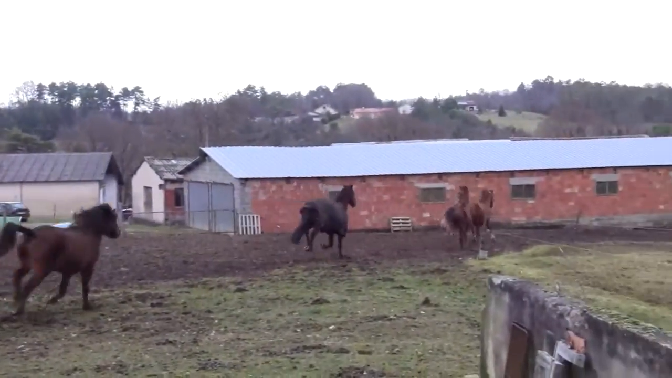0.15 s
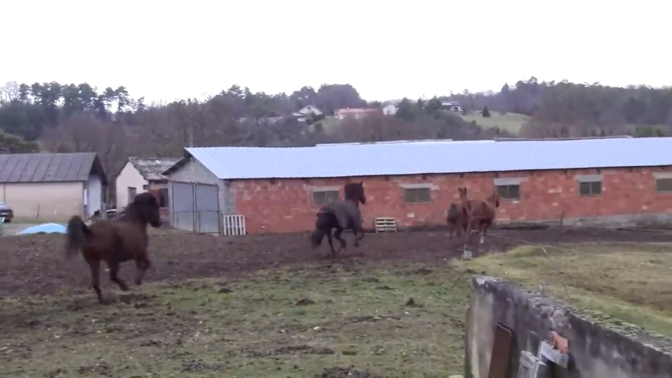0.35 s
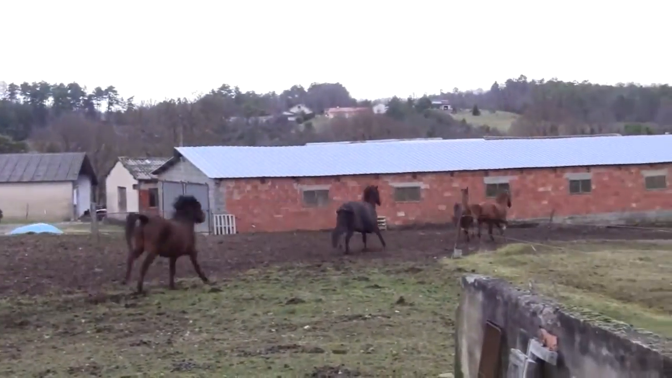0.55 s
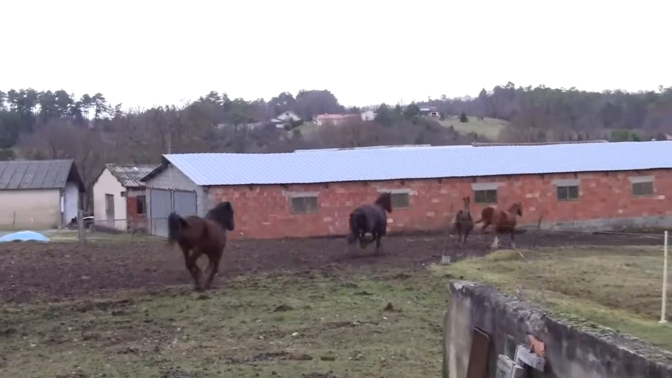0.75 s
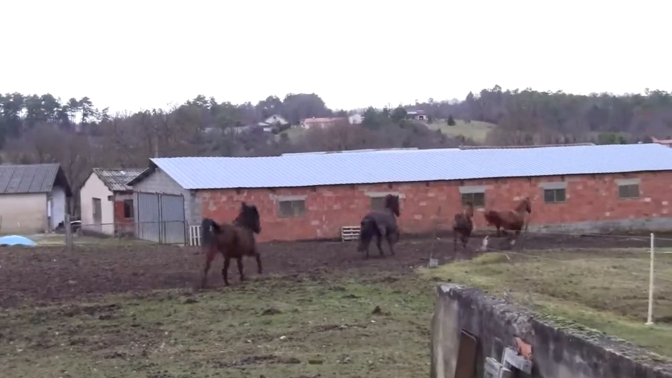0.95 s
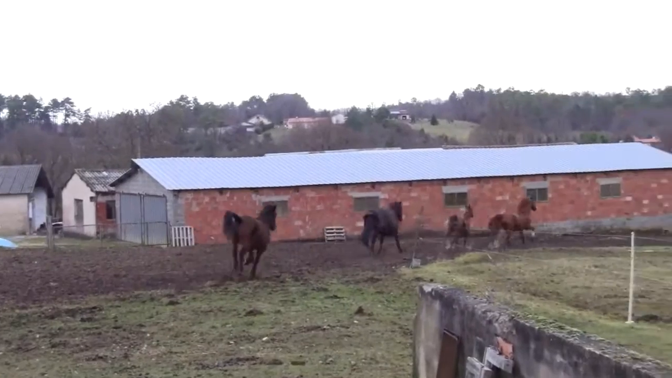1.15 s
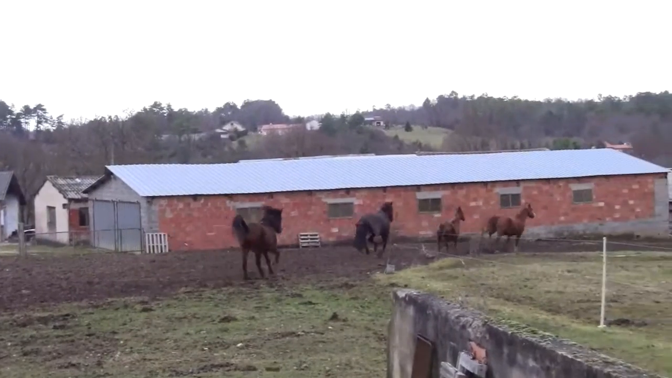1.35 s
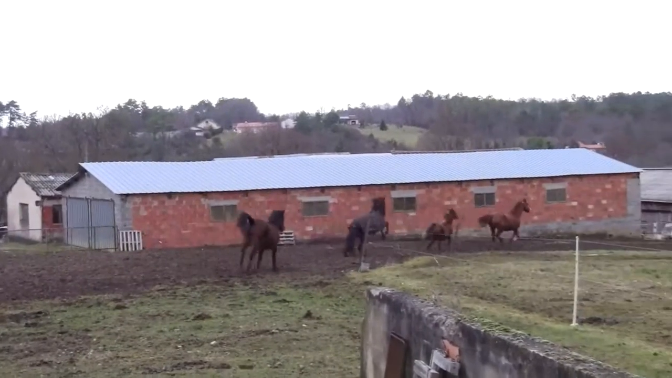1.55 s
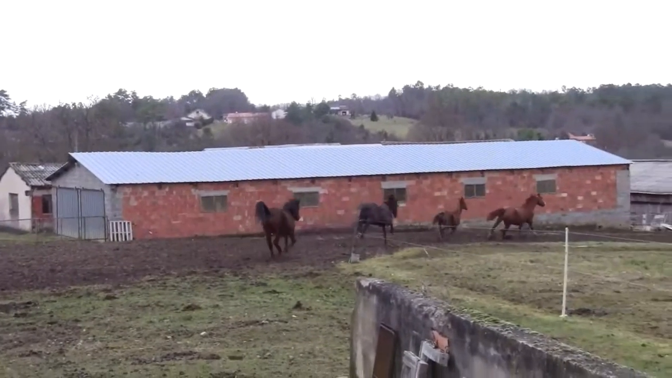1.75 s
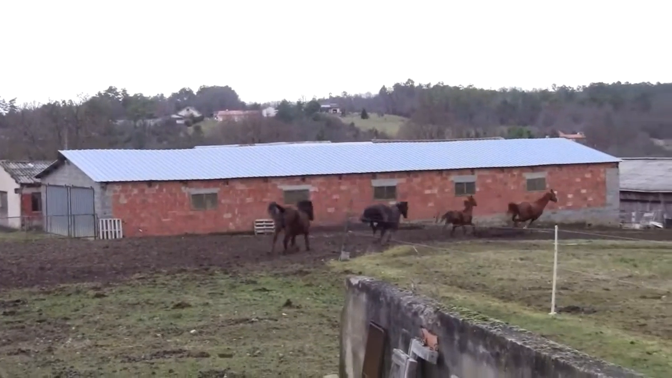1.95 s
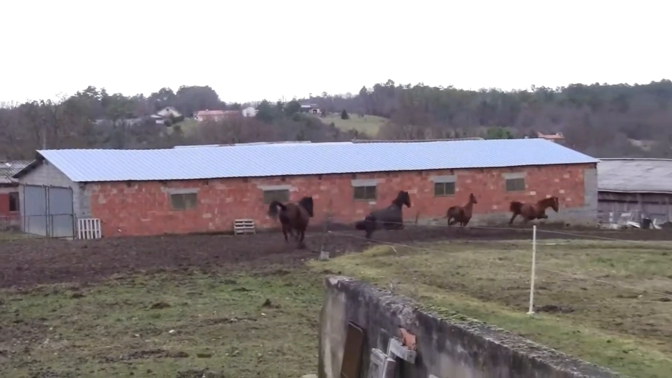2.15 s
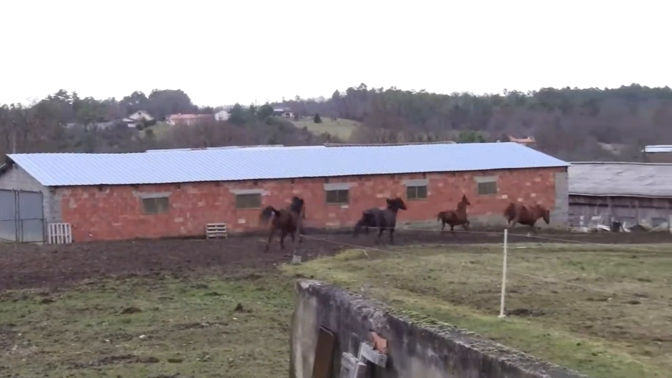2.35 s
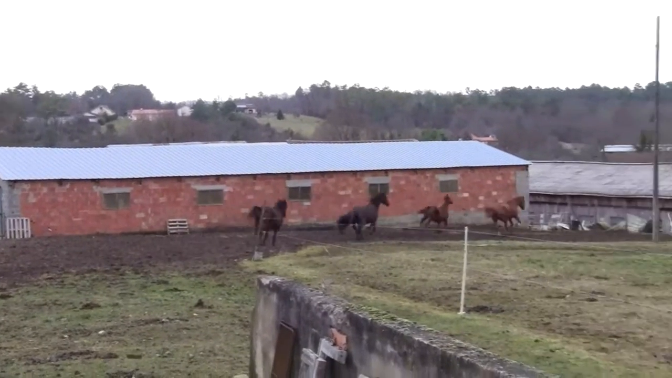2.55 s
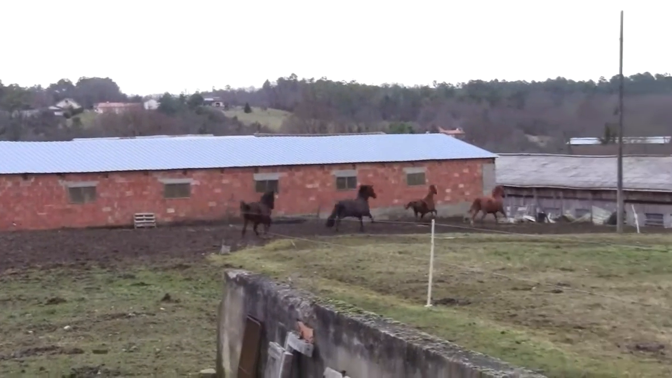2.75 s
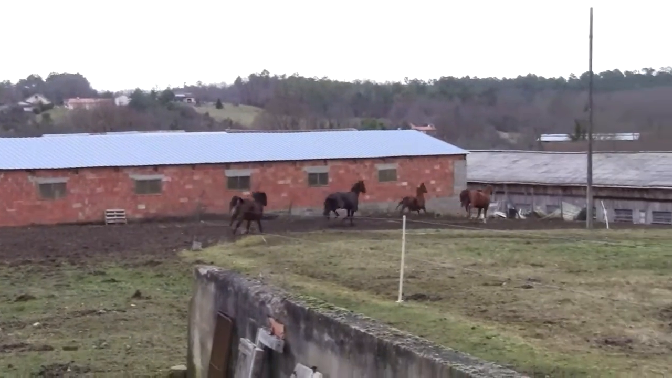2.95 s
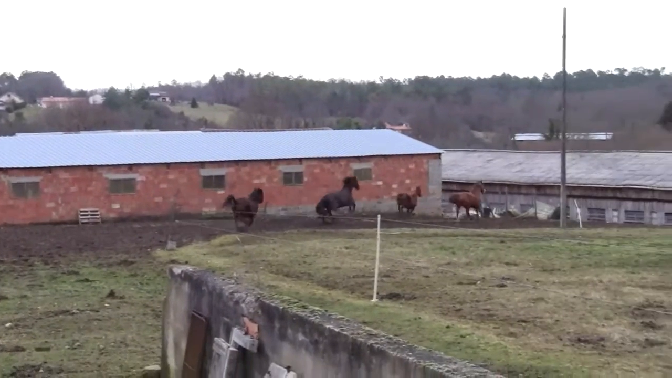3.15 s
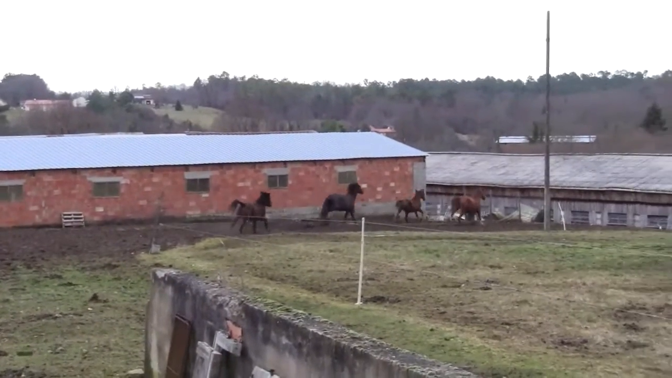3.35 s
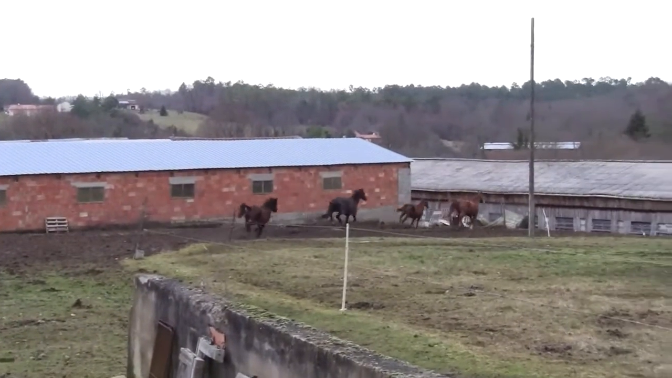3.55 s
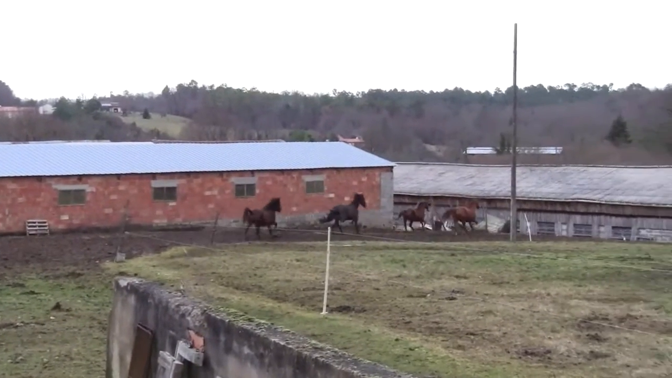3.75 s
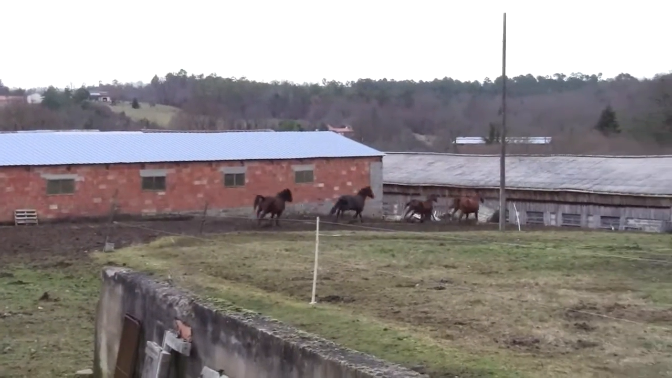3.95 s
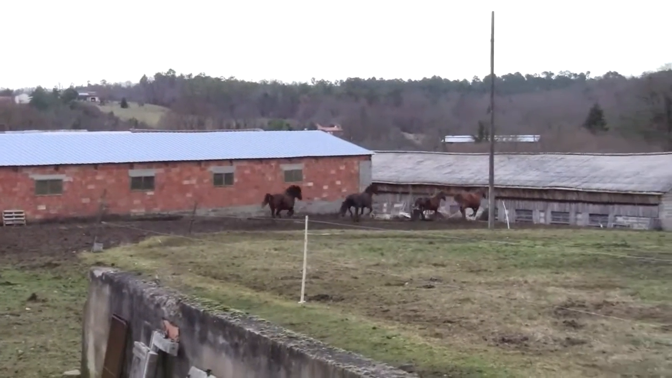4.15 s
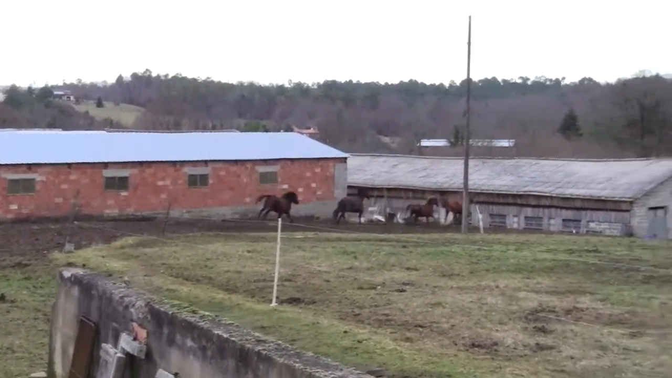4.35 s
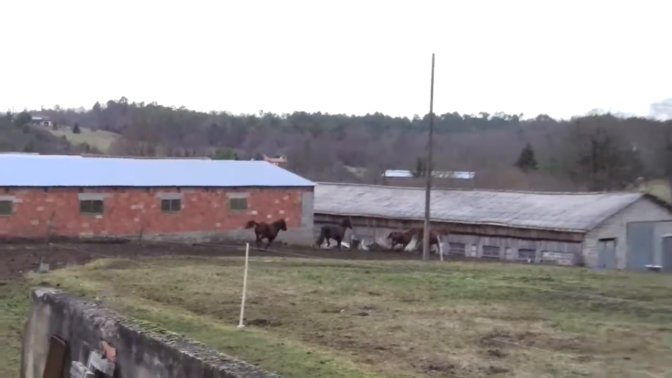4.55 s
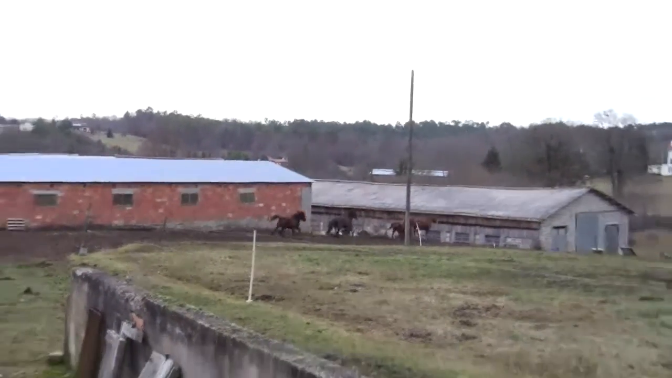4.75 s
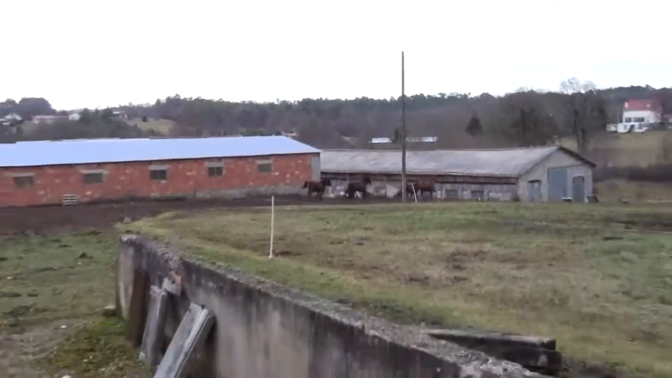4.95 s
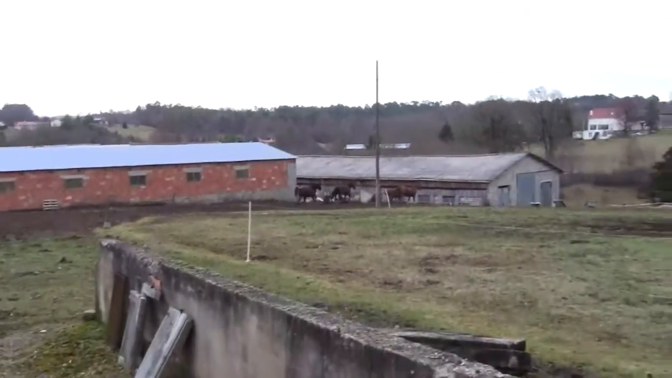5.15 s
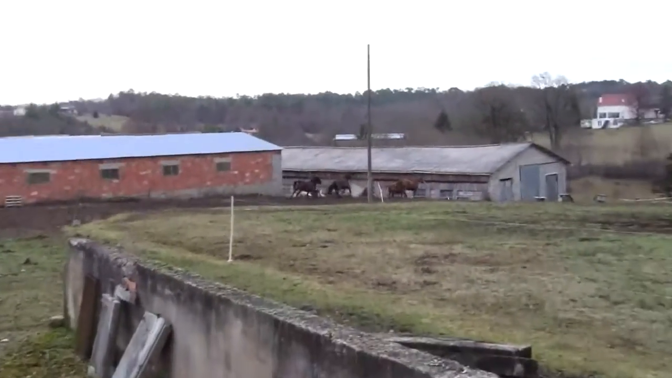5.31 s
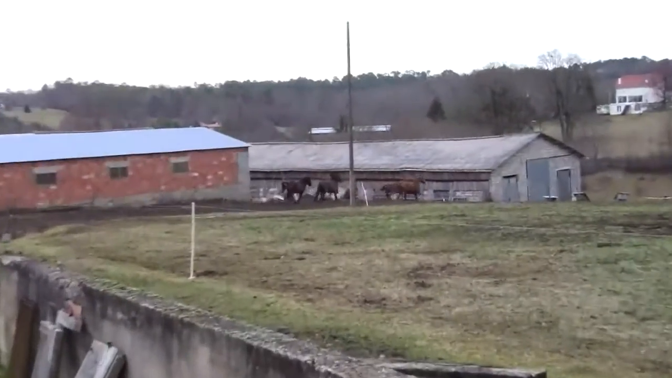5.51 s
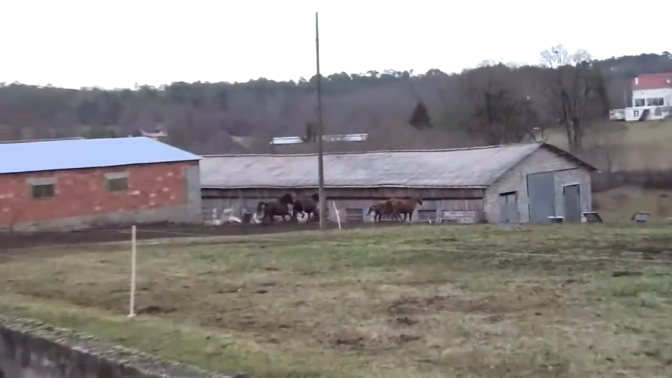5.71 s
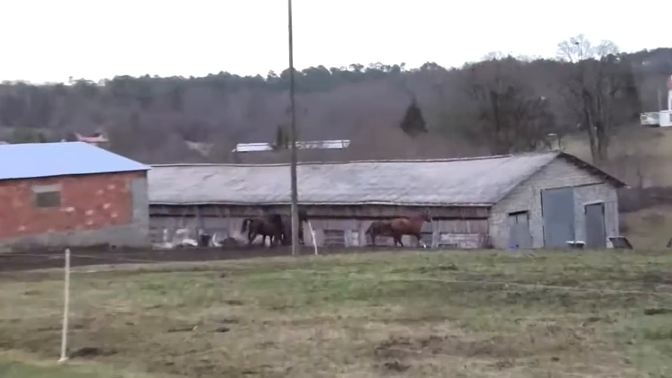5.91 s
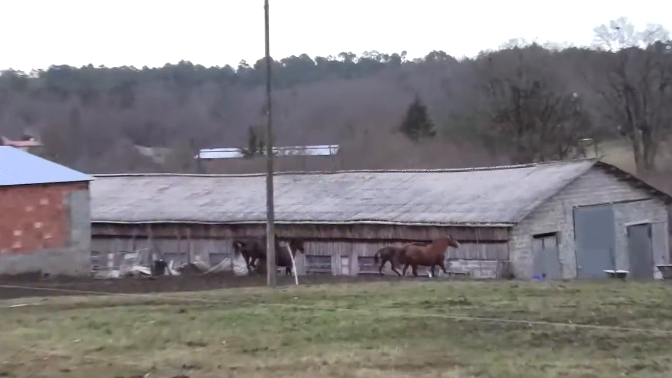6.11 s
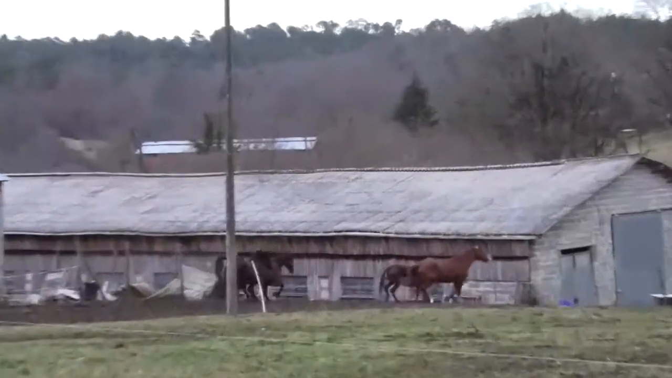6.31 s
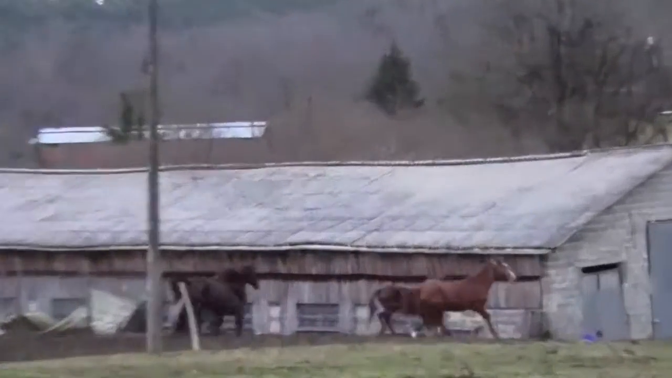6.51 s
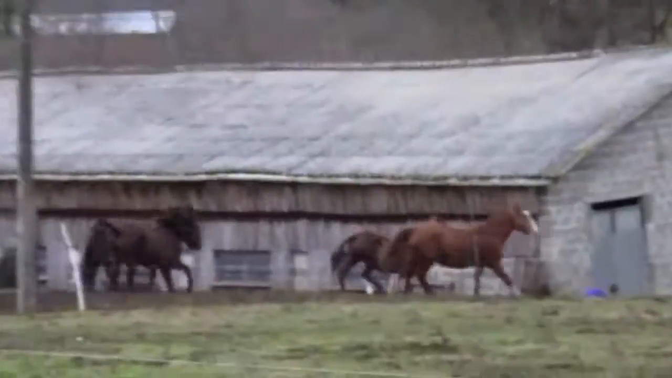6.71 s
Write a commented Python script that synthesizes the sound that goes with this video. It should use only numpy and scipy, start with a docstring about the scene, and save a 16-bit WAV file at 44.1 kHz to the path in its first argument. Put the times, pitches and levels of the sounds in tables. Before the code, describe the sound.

Outdoors beside a long barn, a few horses gallop off across mud and wet grass. Close, heavy, dull thuds and sharp mud splats come first, then an irregular overlapping patter recedes, with some hooves clipping stones. Faint sparrows chirp, a horse snorts softly far off, and fingers knock the hand-held camera around five seconds. The hoofbeats sink into a low hush, ending with slight wind rumble.

```python
"""Wet grass and mud beside a long barn: horses gallop away, heard from a hand-held camera.
Each hoof drives a dull one-or-two-cycle thud from the ground and splats noisy mud; many fainter beats
blur into a patter over filtered-noise hush. Hooves clip stones, one horse snorts, the barn echoes.
Fingers ring the camera shell's modes, its lens motor ticks, far sparrows whistle gliding tones;
a soft treble hiss swells and sinks, and a puff of wind rumbles at the end."""
import sys
import numpy as np
from scipy import signal
from scipy.fft import rfft, irfft, next_fast_len
from scipy.io import wavfile
from scipy.ndimage import uniform_filter1d

SR = 44100
rng = np.random.default_rng(int(sys.argv[2]) if len(sys.argv) > 2 else 0)


def decibels_to_gain(level_db):
    """Convert a level in decibels to a linear amplitude gain (20 dB per decade)."""
    exponent = np.asarray(level_db, float) / 20
    return 10 ** exponent


def pcm_store(signal):
    """Save signal as 16-bit PCM."""
    levels = np.round(np.clip(np.atleast_2d(signal), -1, 1) * 32767)
    wavfile.write(sys.argv[1], SR, levels.astype(np.int16).T)


N = 298539  # length in samples


def evened(x):
    """Normalisation of signal power: scales to rms 1."""
    return x / np.sqrt(np.mean(x ** 2) + 1e-20)


def read(points, hz):
    """Logarithmic frequency scale: interpolates a curve linearly along it."""
    f, value = np.transpose(points)
    return np.interp(np.log(hz + 1), np.log(f + 1), value)


def add(mix, s, sound):
    """Linear superposition: adds a sound to the mix in place, from s seconds."""
    at = round(s * SR)
    part = mix[..., max(at, 0):][..., :sound.shape[-1] + min(at, 0)]
    part += sound[..., max(-at, 0):][..., :part.shape[-1]]


def coloured(x, points):
    """Zero-phase filtering: multiplies the spectrum by a gain curve of (f/Hz, level/dB)."""
    size = next_fast_len(x.shape[-1])
    gain = decibels_to_gain(read(points, np.fft.rfftfreq(size, 1 / SR)))
    return irfft(rfft(x, size) * gain, size)[..., :x.shape[-1]]


def air(points, patchy_db):
    """Partial coherence: two-channel noise, less alike at high frequency, with drifting patches."""
    # likeness of the two noises: f/Hz, coherence/1
    likeness = [(60, 1), (340, 0.95), (1970, 0.59), (11300, 0.38)]
    frames, hz = N // 128 + 5, np.fft.rfftfreq(512, 1 / SR)
    a, b, c, d, patches = rng.standard_normal((frames, 257, 5)).T
    patches = uniform_filter1d(patches, size=8, axis=0)
    patches = evened(uniform_filter1d(patches, size=12, axis=1))
    same = np.clip(read(likeness, hz), -1, 1)[:, None]
    left = a + 1j * b
    right = same * left + np.sqrt(1 - same ** 2) * (c + 1j * d)
    z = np.array([left, right]) * decibels_to_gain(patchy_db * patches)
    noise = signal.istft(z, nperseg=512, noverlap=384)[1][:, :N]
    return evened(coloured(noise, points))


def thud(hz, ms, luck, rings=0.54):
    """Damped elastic rebound: pushed ground swings back, rarefaction first, sagging in pitch."""
    u = np.arange(-1.5, 5, 1000 / (ms * SR))  # time in contact lengths, 0 at the peak
    shape = np.where(u < 0, np.exp(-(u / 0.58) ** 2), np.exp(-(abs(u) / rings) ** 1.44))
    turns = hz * ms / 1000 * (u - 0.029 * u * abs(u))
    return -1.5 * ms / 1000, shape * np.sin(2 * np.pi * turns + 0.44 * luck)


def patter():
    """Incoherent summation: random small hoofbeats and droplets blur over rumble and rustle."""
    # spectrum of the low rumble: f/Hz, relative level/dB
    rumble = [(15, -58), (25, -22), (102, -4.5), (261, 3), (730, -9.5), (1180, -13), (1500, -17.5),
              (1950, -22), (3300, -120)]
    # spectrum of the rustle: f/Hz, relative level/dB
    rustle = [(410, 0.5), (700, -16.5), (1160, -3), (1500, -7.5), (2310, -4), (2720, -11.5), (3060, -7),
              (4200, -8), (6710, -16), (9310, -12), (10200, -19), (11500, -20.5), (15000, -102)]
    # loudness of the blurred herd as it runs off and wheels about: t/s, relative level/dB
    herd = [(0, 0.5), (.45, -1.5), (1.1, 0.5), (1.8, -1.5), (2.6, -0.5), (3.3, -1), (4.2, -3.5), (4.9, -5),
            (5.25, -2.5), (5.95, -5), (6.35, -1.5), (6.599, -8), (6.77, -3)]
    # open air from all sides, the part unlike left and right: rumble level/dB, rustle level/dB
    hush = (-42.5, -58.5)
    beats, drops = np.zeros(N), np.zeros(N)
    for hz in (120.5, 199, 278.0, 342, 416, 583):
        strength = decibels_to_gain(5.0 * np.minimum(rng.exponential(1, N), 2))
        train = (rng.random(N) < 11 / SR) * strength  # 11 beats a second
        beats += signal.oaconvolve(train, thud(hz, 1300 / hz, rng.standard_normal())[1])[:N]
    fizz = coloured(rng.standard_normal(N), rustle)
    droplet = signal.windows.hann(500) ** 2 * np.exp(-np.arange(500) / SR / 0.0032)
    for hz in (1200, 2500, 4140, 8000):  # each droplet hisses in its own band
        strength = decibels_to_gain(1.0 * np.minimum(rng.exponential(1, N), 2.2))
        clumps = (rng.random(N) < 40 / SR) * strength
        spray = signal.oaconvolve(clumps, droplet)[:N]
        drops += spray * coloured(fizz, [(hz / 4, -24), (hz, 0), (hz * 4, -24)])
    out = np.zeros((2, N))
    herd_db = np.interp(np.arange(N) / SR, *np.transpose(herd))
    # level with the herd at 0 dB, then dB per dB of the herd
    rumble_db, rustle_db = -47 + 0.75 * herd_db, -50 + 0.93 * herd_db
    layers = [(rumble_db, hush[0], rumble, 2.03, decibels_to_gain(1.4) * evened(beats)),
              (rustle_db, hush[1], rustle, 2.65, decibels_to_gain(-10.5) * evened(drops))]
    for level_db, hush_db, colour, patchy_db, grains in layers:
        left, right = air(colour, patchy_db)
        ahead = (left + right) / 2 + grains * decibels_to_gain(0.77 * (level_db - hush_db))  # grainier when near
        treble = coloured(ahead, [(4500, -34), (6000, 3.0)])
        ahead += treble * (decibels_to_gain(0.54 * (level_db - hush_db - 7.5)) - 1)  # air dulls the far herd
        out += decibels_to_gain(level_db) * ahead
        out += decibels_to_gain(hush_db) * (left - right) / 2 * [[1], [-1]]
    return out


def hooves():
    """Impact radiation: a thump, a slower heave of soil, scattered short clops, crumbling turf."""
    # the clearest hoofbeats: t/s, thump level/dB, thump f/Hz,
    # clop of the hoof wall against the thump, before each part's own offset: relative level/dB
    strikes = [(0.007, -19.5, 272, -8), (0.023, -16, 276, 0.5), (0.12, -29, 320, -2), (0.138, -16, 228, 4),
               (0.142, -16.5, 246, -15), (0.154, -37, 280, 10), (0.27, -31, 230, 3), (0.28, -22, 305, 0),
               (0.287, -20, 313, 0), (0.402, -30, 272, -5.5), (0.49, -22, 255, -2), (0.556, -22.5, 292, 5),
               (0.604, -27, 189, -8), (0.63, -25.5, 320, -2), (0.693, -32.5, 350, -2),
               (0.772, -20, 322, -29), (0.784, -28, 250, 14), (0.813, -19, 272, -22), (0.832, -32, 230, 13),
               (0.908, -34.5, 190, 9.5), (0.968, -28, 307, -2), (0.988, -26, 275, 8.5),
               (1.013, -26.5, 280, -9), (1.041, -25.5, 320, -17), (1.063, -27.5, 240, -27),
               (1.101, -22, 280, -8), (1.153, -32.5, 298, -7), (1.179, -30, 289, 1.5),
               (1.244, -31.5, 242, 2.5), (1.369, -29, 270, -5), (1.438, -21.5, 262, -8),
               (1.499, -23, 230, -11), (1.52, -26.5, 230, -1.5), (1.598, -25.5, 260, -5.5),
               (1.735, -28.5, 288, 10), (1.823, -22, 307, -1.5), (1.856, -25.5, 260, 0.5),
               (1.878, -21, 294, -14), (1.977, -25.5, 308, -8), (2.033, -24, 290, -4.5),
               (2.078, -24, 282, -8.5), (2.131, -27, 330, -24), (2.197, -22.5, 312, 6.5),
               (2.232, -30, 300, -18), (2.26, -23.5, 250, -13), (2.299, -31.5, 170, 2.5),
               (2.334, -19, 297, -10), (2.382, -22.5, 240, -17), (2.427, -28.5, 290, -8),
               (2.505, -20, 327, -1.5), (2.554, -22.5, 290, -0.5), (2.599, -22, 268, -9),
               (2.66, -21, 230, -15), (2.735, -34, 340, 9.5), (2.747, -32.5, 230, 8),
               (2.755, -23, 310, -10), (2.775, -32, 270, -8), (2.813, -30, 310, -12),
               (2.875, -29, 245, -14), (3.075, -27.5, 231, -4.5), (3.241, -34, 288, 5),
               (3.357, -28.5, 330, 4.5), (3.428, -27.5, 364, -5), (3.514, -25, 287, -9),
               (3.58, -20.5, 296, -17), (3.659, -28, 260, -12), (3.722, -30, 210, -12),
               (3.821, -28, 246, 2), (3.88, -30, 240, -5.5), (4.066, -28, 250, -11),
               (4.215, -31.5, 220, -6), (4.447, -27.5, 254, -12), (4.482, -28.5, 228, -8),
               (4.774, -31, 300, -12), (5.142, -33.5, 230, 0.5), (5.183, -34, 280, 5.5),
               (6.149, -33, 310, -6), (6.185, -40, 230, 2), (6.677, -31, 273, -17)]
    contact_ms, contact_spread = 3.87, 1.07  # how long a hoof presses, and its scatter factor
    clop_rings = 0.68  # how long the hoof wall swings on, in contact lengths
    out, crumble = np.zeros(N), np.zeros(N)
    t = np.arange(6000) / SR
    crumbling = (decibels_to_gain(-60 * t / 0.057) + decibels_to_gain(-16 - 60 * t / 0.32)) * (1 - np.exp(-t / 0.00059))
    for (s, db, hz, clop_db), luck in zip(strikes, rng.standard_normal((len(strikes), 5, 3))):
        ms = contact_ms * contact_spread ** luck[0, 1]
        clop_hz = 620 * (1 + 0.5 * np.exp(-s / 0.25))  # the closest strides keep their brightness
        # each part: delay s, level dB, pitch Hz, contact ms, perhaps ringing
        parts = [(0, db, hz, ms), (.004, db - 16, 119, 21)]
        parts += [(0.00061, db + clop_db - 2, clop_hz * 1.107 ** luck[1, 0], 2.62, clop_rings)]
        for late, tone, _ in luck[3:]:  # toe, heel
            parts += [(0.00199 * late, db + clop_db - 15.0, 1.37 * clop_hz * 1.34 ** tone, 1.8)]
        for (late, part_db, part_hz, part_ms, *rings), chance in zip(parts, luck[:, 2]):
            lead, sound = thud(part_hz, part_ms, chance, *rings)
            add(out, s + late + lead, decibels_to_gain(part_db) * sound)
        add(crumble, s, decibels_to_gain(db + .5 * clop_db) * crumbling)
    lumps = decibels_to_gain(3.5 * evened(uniform_filter1d(rng.standard_normal(N), size=60)))
    soil = coloured(rng.standard_normal(N), [(60, -44), (150, 9.5), (350, 7.0), (1300, -2.5),
                                             (2200, -15.5), (9000, -21.5)])
    return out + decibels_to_gain(-11.0) * crumble * evened(lumps * soil)


def barn(x, t60):
    """Exponential reverberation: scattered ground and wall echoes, slightly unlike in each ear."""
    taps = np.zeros((2, 8000))
    at = np.arange(80, 7960, 40) + rng.integers(0, 40, (2, 197))
    np.put_along_axis(taps, at, rng.choice([-1., 1.], at.shape), 1)
    taps *= decibels_to_gain(-60 * np.arange(8000) / SR / t60)
    ears = taps[0] + 0.021 * taps[1] * [[1], [-1]]
    return signal.oaconvolve(x[None], ears / np.linalg.norm(taps[0]), axes=1)[:, :N]


def splats():
    """Noise-burst radiation: grainy, sharp at the front, darker or brighter by what flies."""
    # the clearest mud splats and flung clods: t/s, level/dB, treble re body level/dB, time scale/ms
    bursts = [(0.021, -24.5, -2.5, 5.7), (0.135, -23, -2, 3.6), (.208, -26, 29, 1.2), (0.267, -31, 0, 3.6),
              (0.283, -39, -12, 2.7), (.305, -41.5, -13, 3), (.488, -33.5, -2, 5.8),
              (0.557, -33.5, -5, 4.1), (0.696, -32.5, -11, 3.1), (.74, -41, 9, 2.9), (.767, -37, -5, 4),
              (.895, -36, 10, 1.2), (0.929, -31.5, 22, 1.3), (.951, -41, 11, 1.5), (1.035, -37.5, 3, 5.6),
              (1.152, -37, -3, 4.3), (1.208, -34.5, -1, 6.9), (1.248, -36.5, -7, 5.3),
              (1.315, -36, -21, 7.5), (1.431, -37, -9, 3.8), (1.495, -35.5, -4.5, 5),
              (1.573, -34.5, -12, 7.8), (1.874, -33.5, -16, 3), (1.894, -30, 26, 1.7),
              (2.008, -35.5, -8, 7.4), (2.126, -35.5, -10, 4.2), (2.166, -36, -6, 2.5),
              (2.259, -36, -7, 3.1), (2.297, -33, -3, 3.5), (2.317, -24, -5.5, 2.6), (2.321, -35, -2, 4.7),
              (2.348, -33, -2, 2.8), (2.37, -26.5, -13, 3.4), (2.421, -31, -4, 2.5), (2.425, -30.5, 2, 2.3),
              (2.5, -36.5, -5, 3.9), (2.55, -29, -24, 5.1), (2.603, -37.5, -9, 5.5), (2.656, -38, -27, 3.4),
              (2.752, -24, 5.5, 3.2), (2.81, -23.5, -5, 2.9), (2.974, -32, 4, 2.3), (2.986, -36, -4, 2),
              (3.144, -35, -19, 3.8), (3.174, -38, -23, 4.2), (3.312, -36, -4, 8.2), (3.364, -35, 0, 3.6),
              (3.383, -40, -6, 8), (3.433, -35.5, -13, 6.6), (3.909, -39, 5, 3.6), (3.949, -35, -7, 3.4),
              (5.385, -29.5, 14, 1.8)]
    # spectrum of the mud: f/Hz, relative level/dB
    mud_colour = [(300, -6), (900, 6.5), (2300, 4.5), (2800, -4.5), (4200, 0.5), (6500, -17), (9000, -10),
                  (10300, -17.5), (11500, -15)]
    low, high = np.zeros(N), np.zeros(N)
    for s, db, treble_db, ms in bursts:
        u = np.arange(0, 14, 1000 / (ms * SR))
        decay = np.exp(-(u / 1.16) ** 2) + decibels_to_gain(-8.5 - 2.15 * u)  # a slap, then a spray of drops
        burst = np.minimum(u / 0.56, 1) * decay
        share = 1 / (1 + decibels_to_gain(-treble_db) ** 2)
        add(low, s, decibels_to_gain(db) * np.sqrt(1 - share) * burst)
        add(high, s, decibels_to_gain(db) * np.sqrt(share) * burst)
    lumps = decibels_to_gain(3.3 * evened(uniform_filter1d(rng.standard_normal(N), size=24)))
    grit = air(mud_colour, patchy_db=3.5)[0]  # no two splats have the same colour
    grit *= lumps / np.sqrt(uniform_filter1d(grit ** 2, size=400))
    bright = signal.sosfiltfilt(signal.butter(4, 5000, "high", fs=SR, output="sos"), grit)
    return (low * evened(grit - bright) + high * evened(bright)) / np.sqrt(2)


def lens():
    """Antiphase vibration: motor steps on a 20 ms beat shake the microphones against each other."""
    # spells of lens motor stepping: start t/s, end t/s
    spells = [(0.02, 3.56), (4.02, 4.5)]
    t, out = np.arange(800) / SR, np.zeros(N)
    tone = np.sin(2 * np.pi * 1750 * t) + 0.25 * np.sin(2 * np.pi * 1570 * t)
    tick = tone * np.exp(-t / 0.015)
    for start, end in spells:
        steps = start + .02 * np.cumsum(rng.choice([1, 2, 2, 2, 2, 3], size=120))
        for s in steps[steps < end]:
            add(out, s, decibels_to_gain(-54.5 + 1.2 * rng.standard_normal()) * tick)
    return out * [[1], [-1]]


def stones():
    """Stiff-body impact: short, higher knocks of the same shape as a thud."""
    # a hoof clips a stone: t/s, level/dB, f/Hz
    clacks = [(1.33, -31, 1340), (2.657, -35.5, 2500), (2.795, -30.5, 800), (2.8118, -27, 1570),
              (3.182, -34, 1260), (3.318, -30, 1200), (3.364, -32.5, 3780), (3.427, -32, 1140),
              (3.4317, -26, 3370), (3.468, -37, 1350), (3.884, -37, 1200)]
    cycles = 4.1  # per contact length
    out = np.zeros(N)
    for (s, db, hz), luck in zip(clacks, rng.standard_normal(len(clacks))):
        lead, sound = thud(hz, 1000 * cycles / hz, luck)
        add(out, s + lead, decibels_to_gain(db) * sound)
    return out


def sparrows():
    """Frequency modulation: short whistles slide from one pitch to another with a slight wobble."""
    # far chirps: t/s, level/dB, from f/Hz, to f/Hz, length/ms
    chirps = [(3.045, -50, 3920, 3670, 28), (3.1, -53, 3900, 3720, 23), (3.297, -51, 4900, 3440, 26),
              (3.665, -55.5, 4550, 3490, 75), (3.876, -52, 3800, 3970, 26), (4.0, -54, 4170, 3820, 31),
              (4.213, -50, 4550, 3980, 35)]
    out = np.zeros(N)
    for s, db, from_hz, to_hz, ms in chirps:
        u = np.arange(0, 1, 1000 / (ms * SR))
        wobble = 0.008 * evened(uniform_filter1d(rng.standard_normal(4000), size=90))[:len(u)]
        glide = (from_hz + (to_hz - from_hz) * u) * (1 + wobble)
        whistle = np.sin(2 * np.pi * np.cumsum(glide) / SR)
        add(out, s, decibels_to_gain(db) * np.sin(np.pi * u ** 0.85) * whistle)
    return out


def resonate(x, hz, width):
    """Time-varying resonance: shifts the curve hz to zero, smooths, shifts back; peak gain 1."""
    turn, r = np.exp(2j * np.pi * np.cumsum(hz) / SR), np.exp(-np.pi * width / SR)
    return 2 * (turn * signal.lfilter([1 - r], [1, -r], x / turn)).real


def snort():
    """Source-filter principle: a far horse's fluttering breath excites nostrils as they flare."""
    # nostril resonances: highest f/Hz, bandwidth of each of two stages/Hz, level/dB, rise in pitch/1
    nostrils = [(1095, 330, 1, .03), (2500, 950, -1.5, 0.29), (1760, 340, -8.5, 0.11)]
    start_s, length_s, level_db = 4.49, 0.14, -49.5
    u, out = np.arange(0, 1, 1 / (length_s * SR)), np.zeros(N)
    swell = np.sin(np.pi * u ** 1.5)
    flutter = decibels_to_gain(1.9 * evened(uniform_filter1d(rng.standard_normal(SR), size=200)))
    breath = (flutter * rng.standard_normal(SR))[:len(u)]
    nose = np.zeros(len(u))
    for hz, width, db, rise in nostrils:
        curve = hz * (1 - rise + rise * swell)
        nose += decibels_to_gain(db) * evened(resonate(resonate(breath, curve, width), curve, width))
    add(out, start_s, decibels_to_gain(level_db) * swell ** 0.63 * nose)
    return out


def ring(t, size, damping):
    """Modal superposition: the shell's decaying modes after one tap."""
    # modes of the shell: f/Hz at size 1, level/dB, t60/s at damping 1
    modes = [(1108, 31, 0.027), (1532, 8, 0.13), (2550, -5, 0.087)]
    return sum(decibels_to_gain(db - 60 * damping * t / t60) * np.sin(2 * np.pi * hz * size * t)
               for hz, db, t60 in modes)


def shell():
    """Impact and stick-slip excitation: fingers ring the shell, nearer the right microphone."""
    # knocks: t/s, level/dB, left re right level/dB, size as a factor on pitch/1,
    # bare crack re knock level/dB, damping by the grip/1
    knocks = [(5.006, -34, -5, 0.85, -2, 2), (5.025, -20.5, -1, 1.02, -7, 2.5),
              (5.042, -37.5, -6, 1.0, 5.5, 2.6), (5.044, -24, -7, 0.88, -26, 1),
              (5.18, -36, -9, 0.67, -7, 0.89), (5.242, -26, -9.5, 0.69, -22, 1.25),
              (6.7, -33, -6, 0.62, -12, 1.6), (6.745, -36, -10, 0.9, -12, 1.1),
              (6.766, -35, -4, 0.93, -5, 1.1)]
    # a finger slides on the shell: start t/s, length/s, relative level/dB
    slides = [(5.007, 0.052, -45), (5.222, 0.034, -50.5), (6.732, 0.15, -45.5)]
    # a light touch wakes the high modes: f/Hz, level/dB
    brush = [(300, 4), (1100, 10), (1600, 4), (2700, 7), (3600, -2), (6000, -12)]
    # how a touch shakes the microphones against each other: f/Hz, level/dB
    shake = [(300, -23), (700, -33), (1500, 8), (2100, -8), (2900, -3), (3600, -23), (8000, -30)]
    t, out = np.arange(2500) / SR, np.zeros((2, N))
    for s, db, pan_db, size, crack_db, grip in knocks:
        knock = ring(t, size, damping=grip) * (1 - np.exp(-t / 0.00025))
        crack = coloured(rng.standard_normal(len(t)),
                         [(400, -11), (1200, -2.0), (3000, -6.5), (8000, -29.5)])
        knock = knock / abs(knock).max() + decibels_to_gain(crack_db) * evened(crack) * np.exp(-t / 0.004)
        add(out, s, decibels_to_gain([[db + pan_db / 2], [db - pan_db / 2]]) * knock)
    pressure = np.zeros(N)
    for s, length, db in slides:  # each slide swells and fades
        u = np.arange(0, 1, 1 / (length * SR))
        add(pressure, s, decibels_to_gain(db) * np.sin(np.pi * u ** 1.33) ** 0.96)
    slips = (rng.random(N) < 2500 / SR) * rng.standard_normal(N) * pressure  # 2500 slips a second
    held = ring(t, 1.05, damping=2.2)
    brushed = signal.lfilter([1, -1.7, .72], 1, held)  # tilts towards the treble
    slips = signal.oaconvolve(slips, evened(brushed) / np.sqrt(2500 / SR * len(t)))[:N]
    out += decibels_to_gain([[-2.5], [2.5]]) * coloured(slips, brush)
    sway = coloured(np.roll(out.mean(0), 30), shake)  # 30 samples late
    return out + decibels_to_gain(1.0) * sway * [[1], [-1]]


def hiss():
    """Band-shaped noise under a Gaussian envelope: a soft hiss swells and sinks."""
    # spectrum of the hiss: f/Hz, relative level/dB
    hiss_colour = [(1500, -25), (3000, 2), (4200, 2), (5500, -12), (9000, -23)]
    centre_s, width_s, level_db = 6.36, 0.15, -56
    t = np.arange(N) / SR
    swell = np.exp(-((t - centre_s) / width_s) ** 2)
    return decibels_to_gain(level_db) * swell * evened(coloured(rng.standard_normal(N), hiss_colour))


def gust():
    """Turbulent pressure at the microphone ports: deep lumpy noise, only partly alike in the two."""
    centre_s, width_s, level_db = 6.65, .15, -47
    t = np.arange(N) / SR
    lumps = coloured(rng.standard_normal((2, N)),
                     [(15, -10), (40, -7.0), (90, -12), (250, -17), (1000, -90)])
    swell = np.exp(-((t - centre_s) / width_s) ** 2)
    return decibels_to_gain(level_db) * swell * evened(lumps + 1.2 * lumps[0])


def scene():
    """Superposition of direct sound, echoes, hush and handling; mud treble leans to the right."""
    # mud treble taken from the left and given to the right: f/Hz, level/dB
    aside = [(1000, -46), (4000, -21), (9000, -11.5), (11000, -5)]
    ground = hooves() + stones() + snort()
    mud = splats()
    birds = sparrows()
    direct = ground * decibels_to_gain([[-.2], [.2]]) + mud + coloured(mud, aside) * [[-1], [1]]
    echoes = decibels_to_gain(-11.5) * barn(ground + decibels_to_gain(-2) * mud + decibels_to_gain(9) * birds, t60=0.19)
    return direct + echoes + birds + patter() + shell() + lens() + gust() + hiss()


def roll_off(x):
    """The treble ends steeply here."""
    return signal.sosfilt(signal.butter(12, 11930, fs=SR, output="sos"), x)


def record(dry):
    """Band-limited transduction: the microphone cuts the deepest bass and the top."""
    heard = coloured(dry, [(25, -12.0), (90, 1.0), (10200, -1.5), (11300, -16), (12000, -37)])
    return roll_off(heard)


dry = scene()
out = record(dry)
pcm_store(out)
```